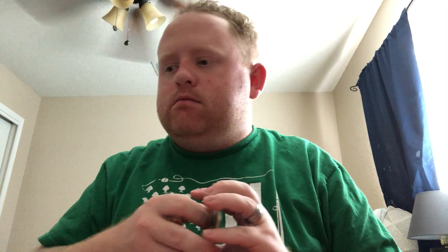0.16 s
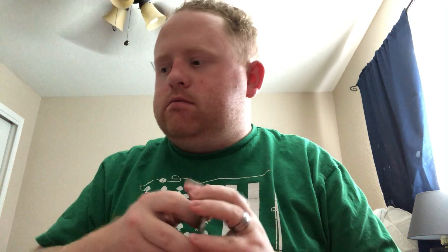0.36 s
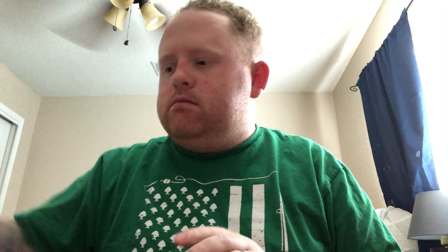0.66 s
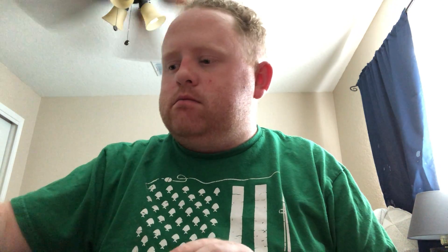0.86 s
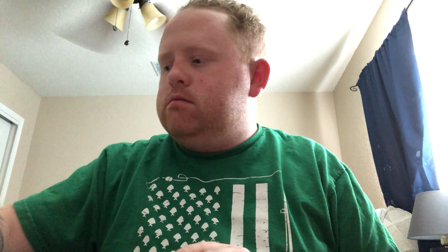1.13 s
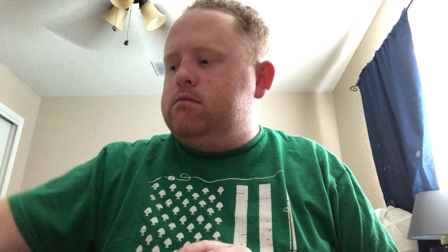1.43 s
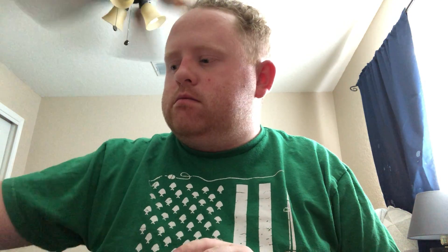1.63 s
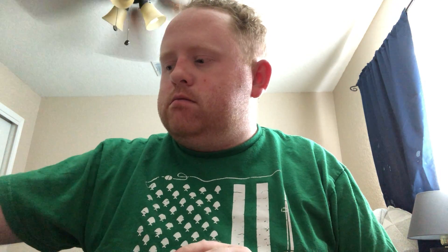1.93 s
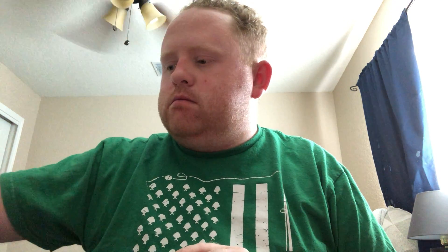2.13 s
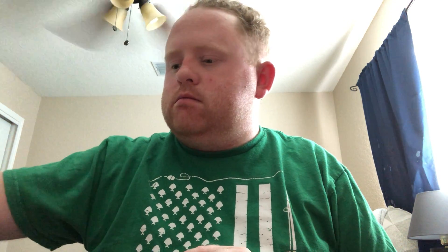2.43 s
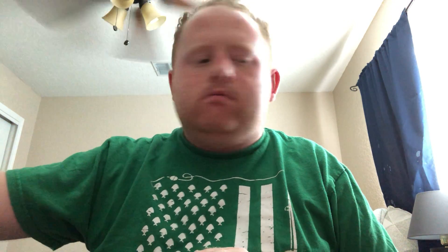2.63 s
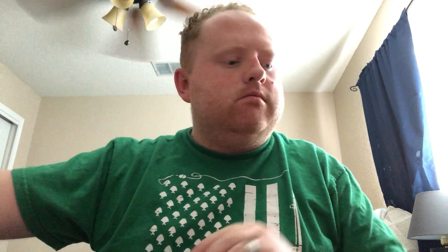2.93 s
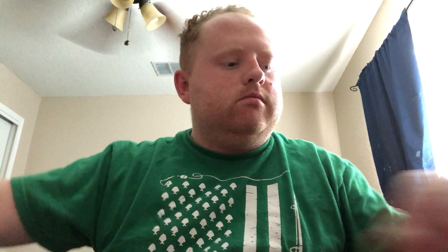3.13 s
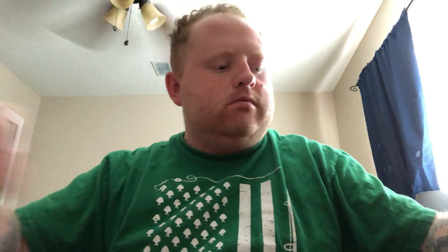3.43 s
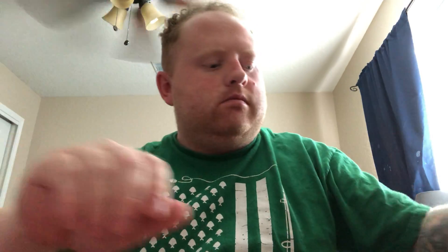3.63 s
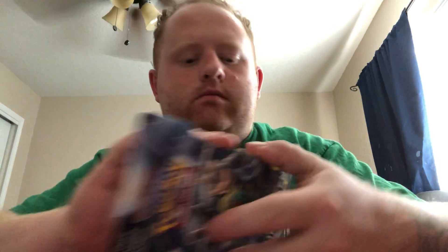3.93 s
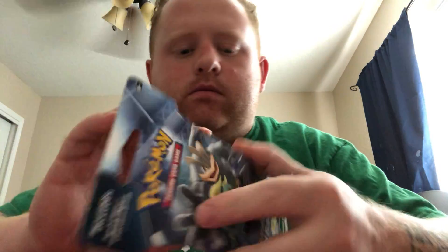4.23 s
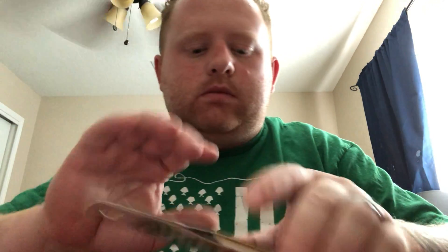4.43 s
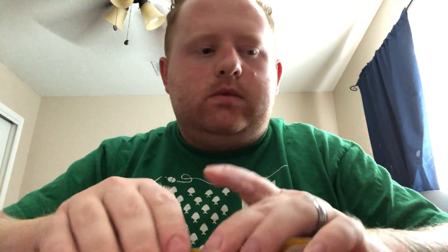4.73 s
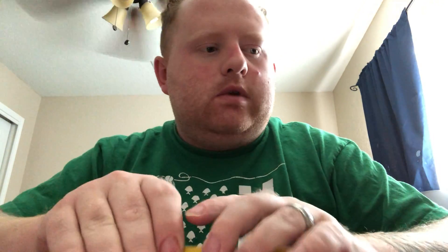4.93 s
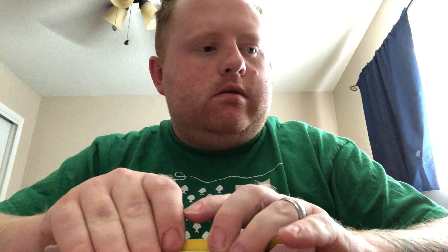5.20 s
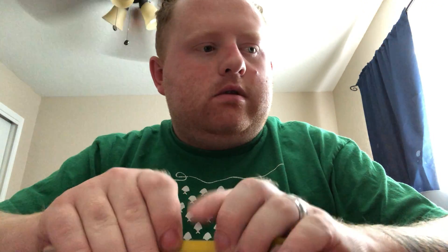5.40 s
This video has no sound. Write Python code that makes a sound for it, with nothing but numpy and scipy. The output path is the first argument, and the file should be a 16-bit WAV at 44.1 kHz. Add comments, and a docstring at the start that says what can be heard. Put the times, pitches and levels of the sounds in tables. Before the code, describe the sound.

Soft knocks lead to a sharp clack as cards are set down on a tabletop, then quietly pushed and tapped about. The handling moves nearer the microphone, where a card sleeve rustles and scuffs between the fingers, gives a run of crisp little cracks and briefly starts to rip. A quiet fan runs steadily in the small room throughout.

```python
"""Trading cards and a sleeve at a table.

A stack clacks down at arm's length and rings the table top, then is slid and tapped about among dull
knocks. Close by, fingers rub a card sleeve: friction, a stream of tiny catches. Fibres in its glued
flap crack as it bends, and it starts to rip open in quick slips. A fan runs in the small room."""
import sys
import numpy as np
from scipy import signal
from scipy.fft import rfft, irfft
from scipy.io import wavfile
from scipy.ndimage import uniform_filter1d

SR = 44100
rng = np.random.default_rng(int(sys.argv[2]) if len(sys.argv) > 2 else 0)


def wrap_up_sound(samples):
    """Save the sound to the file named by the first command line argument, as 16-bit audio."""
    columns = np.atleast_2d(samples).T
    # keep every value between -1 and 1, then stretch to whole-number steps
    tamed = np.clip(columns, -1, 1)
    steps = np.round(tamed * 32767).astype(np.int16)
    wavfile.write(sys.argv[1], SR, steps)


N = 245186
TIME_S = np.arange(N) / SR
EVENT_S = np.arange(8192) / SR  # time axis of one short event

# The stack lands on one edge, then falls flat.
# Each row: start in seconds, edge crack in dB, table ring in dB, chatter from 0 to 1.
CLACKS = [(1.2416, -21.5, -28, 0.08), (1.2436, -30, -38.5, 0.54)]
# Pushes of cards over the table. Each row: start in seconds, length in seconds, level in dB.
SLIDES = [(1.691, 0.16, -73.5), (1.847, 0.087, -51.5), (1.965, 0.03, -65), (1.995, 0.076, -88),
          (2.09, 0.071, -70.5), (2.18, 0.036, -57.5), (2.206, 0.16, -63), (2.481, 0.036, -71),
          (2.87, 0.063, -78.5), (3.468, 0.031, -59), (3.504, 0.042, -54.5), (3.568, 0.057, -77.5)]
# Stack corners touching down. Each row: start in seconds, level in dB, contact time in seconds.
TAPS = [(2.127, -50.5, .0009), (2.1955, -48, 0.00072), (2.209, -42, 0.00013), (2.2131, -44, 0.00027),
        (2.2194, -40.5, .0005), (2.232, -49, 0.0011)]
# Fibre cracks. Each row: start in seconds, level in dB, main resonance in Hz, bass in dB.
CRACKS = [(4.926, -47, 3140, 7), (4.938, -42, 4400, 3), (4.9848, -39, 3800, 0.5), (5.033, -43.5, 4530, -17),
          (5.0453, -45, 4540, -10), (5.0585, -42, 4440, -8), (5.0815, -41, 4530, -14),
          (5.1163, -34, 3810, 2), (5.1378, -35, 3940, -1), (5.1605, -39, 4300, -16),
          (5.174, -39.5, 4380, -2), (5.1952, -42.5, 4120, -2), (5.239, -39, 4440, -8.5),
          (5.2477, -39.5, 4700, -9), (5.2847, -32, 3700, -3.5), (5.319, -28, 3830, -3.5),
          (5.333, -43, 4600, -13), (5.353, -43, 4570, -8), (5.3691, -40.5, 3760, -4), (5.379, -44, 3660, 3),
          (5.392, -44.5, 3730, 2), (5.407, -47, 3530, 4), (5.4293, -48, 3800, 11), (5.4399, -40, 3660, 2)]
# The flap gives slowly, then runs like a zip. Each row: start and end in seconds, slips per second,
# then level, bass, treble and thump in dB.
RIPS = [(5.4532, 5.482, 92, -37, 0, -7.5, -37.5), (5.4995, 5.565, 124, -37, -6, 3, -36)]
# Finger strokes on the sleeve. Each row: start and length in seconds, then level, treble, whistle and
# singing in dB, singing pitch in Hz.
RUBS = [(3.657, 0.28, -67.5, -4.5, -12.5, -8, 2880), (3.951, 0.061, -64, -6, -17, -1, 2800),
        (4.022, 0.072, -61.5, -7, -1.5, 1.5, 2750), (4.099, 0.038, -66.5, -14, -14, 7.5, 2720),
        (4.135, 0.063, -66.5, -20, -21, -11, 2750), (4.182, 0.082, -67, -16, -17, 4.5, 2780),
        (4.306, 0.039, -72, -7, -3, -1, 2800), (4.414, 0.077, -68.5, -11, -14, -6, 2800),
        (4.531, 0.062, -65, -11, -8, -14, 2760), (4.649, 0.073, -59, -5.5, -13, -5, 3870),
        (4.738, 0.2, -67.5, -8, -33, -23, 3500), (4.833, 0.079, -54, -3, -15, -15, 3500),
        (4.895, 0.19, -56, -11.5, -25, -27, 3540), (5.06, 0.15, -66, -23, -30, -20, 3500),
        (5.283, 0.67, -62, -25, -39, -24, 3500), (5.438, 0.12, -55.5, -5, -24, -25, 3300)]
# Scuffs of card on card, skin and table.
# Each row: start in seconds, level in dB, length in seconds, bass in dB, treble in dB.
SCUFFS = [(0.027, -54, 0.0026, -5, 3), (0.447, -66, 0.021, 4.5, 7), (0.881, -62.5, 0.044, 5.5, 1),
          (1.0085, -53, 0.0024, 7, -12), (1.019, -55, 0.0039, -8, -2), (1.035, -64.5, 0.025, 1, 1),
          (1.997, -58, 0.016, 5, -8), (2.118, -56, 0.013, 8, -16), (2.192, -52, 0.0088, 2, -10),
          (2.207, -48, 0.012, -7, -5), (2.516, -63, 0.005, 11, -4), (2.551, -56.5, 0.016, 2, 1),
          (2.717, -64, 0.022, -0.5, 7.5), (3.013, -63, 0.005, 8, -10), (3.466, -55, 0.0034, 6, 2),
          (3.478, -54, 0.0074, 4, -17), (3.508, -52, 0.013, -3, -8), (3.517, -44.5, 0.005, -5, 5),
          (3.523, -41.5, 0.004, 0.5, 3.5), (3.543, -53, 0.014, 5, -16), (3.644, -63, 0.0038, 1, 14),
          (3.958, -50, 0.0046, 1, 7), (3.967, -45, 0.0048, -9, -6), (3.9745, -43.5, 0.0019, -5, -11),
          (3.988, -54, 0.00086, -5, 13), (4.25, -54.5, 0.0023, 2, 16), (4.356, -51.5, 0.0026, -11, -1),
          (4.3646, -53, 0.005, -10, 1), (4.4105, -37.5, 0.0038, -3, 2), (4.635, -46.5, 0.0024, 6, 12),
          (4.73, -42, 0.0028, -1, 1.5), (4.828, -56, 0.011, -16, 5), (4.958, -48, 0.0045, 2, 4),
          (5.296, -53, 0.0032, -9, 11)]
# Soft knocks from the table and the handled sleeve. Each row: start in seconds, level in dB, pitch in Hz.
KNOCKS = [(0.277, -44.5, 113), (0.351, -48.5, 130), (0.371, -49, 96), (0.899, -48, 103), (1.021, -50, 89),
          (1.262, -43, 97), (1.274, -42, 215), (1.949, -48, 335), (2.003, -45.5, 680), (2.015, -54, 161),
          (2.05, -47, 115), (2.143, -48, 349), (2.232, -48, 162), (2.275, -45, 370), (2.244, -46, 80),
          (2.564, -47, 155), (3.04, -45.5, 300), (4.214, -49, 76.6), (4.412, -44, 890), (4.732, -40, 495),
          (5.013, -43.5, 460), (5.324, -51, 82), (5.371, -45.5, 120), (5.402, -45, 93), (5.4886, -37, 320)]

# Resonances. Each row: frequency in Hz, width in Hz, level in dB.
TABLE_MODES = [(355, 92, 0), (453, 36, 10), (690, 70, 1), (785, 80, 0.5), (1092, 83, -4.5), (1550, 90, -4),
               (1742, 84, -5), (2140, 78, -3), (3570, 230, -18)]
PRESSED_STACK_MODES = [(390, 84, 11.5), (697, 65, 3.5), (1275, 180, 3.5), (1625, 170, 3.5),
                       (2290, 170, -7.5), (2864, 64, 1.5), (3450, 120, -14), (4700, 460, -14)]
LOOSE_STACK_MODES = [(376, 31, 13.5), (730, 42, 9), (955, 100, -8), (1230, 93, 0.5), (1620, 170, -12),
                     (2120, 70, 0.5), (2390, 70, 0), (3100, 170, -5), (3520, 250, 0), (3900, 120, 5),
                     (5240, 340, -19)]
LYING_SLEEVE_MODES = [(830, 140, 0), (1210, 160, 0), (1720, 110, 6), (2200, 86, 5.5), (2800, 110, 0),
                      (3640, 130, -11), (4530, 120, -9), (5000, 80, -3)]
HELD_SLEEVE_MODES = [(617, 77, 6), (1094, 106, 10), (1920, 260, 4), (2670, 1240, 9.5), (3630, 480, 9),
                     (5670, 460, 2), (6630, 220, -1), (10500, 1200, -13.5)]
PANEL_MODES = [(236, 37, 1), (320, 270, 5.5), (398, 87, 4), (535, 160, -25)]  # the sleeve's panel
FLAP_MODES = [(3900, 600, -5), (6000, 650, 4), (10400, 900, -11)]
SNAP_MODES = [(1040, 370, 2.5), (1680, 780, -4), (3170, 900, -8), (11600, 2100, -16.5)]  # a finger snaps off the sleeve
COATING_MODES = [(1170, 170, 4), (2820, 230, 10), (3360, 180, 5)]  # the coating sings under a finger
WHISTLE_MODES = [(10400, 1700, 0), (13300, 2500, -5)]  # dry fingertip on gloss

# Spectra. Each row: frequency in Hz, gain in dB.
EDGE_EQ = [(150, -44), (500, -6), (1100, -8), (1580, 2.5), (1900, 3.5), (2300, 5), (3000, -4.5), (3700, 0),
           (5000, -9), (6500, -14), (7400, -9.5), (10000, -21.5), (16000, -31)]
BRUSH_EQ = [(250, -3), (450, 8), (900, 3), (2500, -4), (5500, -3), (7500, -7), (10000, -15), (16000, -13)]
SLIDE_EQ = [(150, -16), (400, 13), (600, -1), (900, -14), (1500, -1), (2300, -6), (3200, -8.5),
            (4300, -14.5), (6470, -21.5), (16000, -38)]
RIP_EQ = [(530, -34), (900, 10), (1510, -3), (1830, -1), (2420, 7), (2760, -12), (3040, 7.5), (4250, 5),
          (4860, -9), (6030, 5), (7860, -1.5), (10400, -5), (12400, -23), (16000, -31)]
RUB_EQ = [(700, -5.5), (1050, 2.5), (1500, -1), (2100, 1.5), (3000, -3), (4400, -2.5), (6000, -3.5),
          (8000, -7), (11000, -17), (16000, -17)]
SCUFF_EQ = [(150, -25), (450, 5), (800, 10.5), (1300, 8.5), (2200, 7), (3800, 3), (5500, 0), (8000, -5),
            (16000, -25)]
AIR_EQ = [(15, -51), (25, -27), (48, -7.5), (92, -9), (114, -2), (185, -11), (223, -2.5), (263, -8.5),
          (293, -3), (754, -12.5), (818, -15), (1040, -15), (1650, -27), (3000, -35.5), (5200, -38),
          (7510, -45), (10500, -50.5), (16000, -53.5)]
TABLE_EQ = [(100, -31), (200, -15), (320, 8)]  # little radiates below the first mode
TAP_EQ = [(120, -15), (340, 0.5), (2000, 4)]
ROOM_EQ = [(100, 4), (450, -0.5), (1000, 6), (1800, -2), (4000, -4.5), (10000, 0)]

# Fan motor hum. Each row: frequency in Hz, level in dB.
HUM = [(59.8, -68), (119.7, -64), (220, -65.5), (295, -68.5), (360, -99), (1066.5, -74)]
# Room reverberation. Each row: frequency in Hz, time to fall 60 dB in seconds.
ROOM_T60 = [(100, 0.21), (500, 0.32), (2000, 0.37), (4000, 0.34), (10000, 0.24)]

REACH_S, HELD_S = 3.3, 3.96  # the hand leaves the stack; the sleeve is held
SLIP_ATTACK_S, SLIP_DECAY_S = 0.0005, 0.00059
# Each pair: light push, firm push.
PUSH_DB, PUSH_BASS_DB, PUSH_TREBLE_DB, PUSH_RING_DB = (-75, -49.5), (8.5, 2), (2.5, -17.5), (-15, 7.5)


def clack():
    """The stack brushes down, its edge cracks on the table, the cards chatter and the top rings."""
    out = np.zeros(N)
    for start_s, crack_db, ring_db, chatter in CLACKS:
        contact = chatter * rng.standard_normal(len(EVENT_S)) * np.exp(-EVENT_S / 0.0014)
        contact[0] -= 1
        edge = disperse(colour(contact, EDGE_EQ), 0.00012)
        add(out, start_s, undb(crack_db) * unit(edge, 0.0019))
        top = colour(ring(TABLE_MODES, scatter=0.0074), TABLE_EQ)
        add(out, start_s + 0.00104, undb(ring_db) * unit(top, 0.0064))
    from_peak_s = TIME_S - (CLACKS[0][0] - 0.005)
    swell = np.exp(np.minimum(from_peak_s / 0.0063, -from_peak_s / 0.0021))
    brush = colour(grit(N, rate_hz=46000, spread_db=2), BRUSH_EQ)
    return out + undb(-38) * swell * unit(brush)


def slides(attack_s=0.037, release_s=0.02):
    """Card drags on the table: a light push hisses, a firm one rings the stack, later the sleeve."""
    out = np.zeros(N)
    catches = grit(N, rate_hz=5000, spread_db=-1) * undb(0.98 * wander(90))
    stack = resonate(catches, PRESSED_STACK_MODES, scatter=0.0035)
    sleeve = resonate(catches, LYING_SLEEVE_MODES, scatter=0.0035)
    friction = unit(colour(catches, SLIDE_EQ))
    high = band(friction, 5150, 19845)
    for start_s, length_s, db in SLIDES:
        bass_db = np.interp(db, PUSH_DB, PUSH_BASS_DB)
        treble_db = np.interp(db, PUSH_DB, PUSH_TREBLE_DB)
        ring_db = np.interp(db, PUSH_DB, PUSH_RING_DB)
        drag = friction + undb(ring_db) * (stack if start_s < REACH_S else sleeve)
        low, middle = band(drag, 353, 1290), band(drag, 1180, 3900)
        age_s = TIME_S - start_s
        push = np.clip(age_s / attack_s, 0, 1) * np.exp(-np.maximum(age_s - length_s, 0) / release_s)
        out += undb(db) * push * (middle + undb(bass_db) * low + undb(treble_db) * high)
    return out


def taps():
    """A corner meets the table and rings the stack; a softer contact is longer and duller."""
    out = np.zeros(N)
    for start_s, db, contact_s in TAPS:
        force = np.exp(-EVENT_S / contact_s)
        tap = colour(resonate(force, LOOSE_STACK_MODES, scatter=0.011), TAP_EQ)
        add(out, start_s, undb(db) * unit(tap, 0.0079))
    return out


def cracks():
    """Each breaking fibre flicks the sleeve, which rings briefly and echoes off the table."""
    out = np.zeros(N)
    for start_s, db, hz, bass_db in CRACKS:
        treble_db = -2 + 0.38 * (db + 38)  # harder is brighter
        flick = ring(HELD_SLEEVE_MODES, scale=hz / HELD_SLEEVE_MODES[4][0], scatter=0.057)
        flick = shelves(flick * rise(0.00008), bass_db, treble_db)
        flick = undb(db) * unit(disperse(flick, 0.000336), 0.0022)
        add(out, start_s - 0.0002, flick)
        add(out, start_s + 0.003, undb(-17.5) * shelves(flick, 2.7, -1.8))
    return out


def rips(max_slips=10):
    """The flap tears in quick slips: each a spray of fibres, then the freed panel swings back."""
    out = np.zeros(N)
    envelope = rise(SLIP_ATTACK_S) ** 2 * np.exp(-EVENT_S / SLIP_DECAY_S)
    for slip_s, end_s, rate_hz, db, bass_db, treble_db, thump_db in RIPS:
        for late, weak, heavy, lag in rng.standard_normal((max_slips, 4)):
            fibres = grit(len(EVENT_S), rate_hz=30000, spread_db=4) * envelope
            rasp = resonate(fibres, FLAP_MODES, scatter=0.03)
            spray = unit(colour(fibres, RIP_EQ)) + undb(-9) * rasp
            spray = unit(shelves(spray, bass_db, treble_db, bass_hz=1850), 0.00094)
            swing = unit(ring(PANEL_MODES, scatter=0.1) * rise(0.0032), 0.006)
            if slip_s < end_s:
                add(out, slip_s, undb(db - 2 * np.tanh(weak)) * spray)
                swing_s = slip_s + 0.002 + 0.003 * abs(lag)
                add(out, swing_s, undb(thump_db + 2.5 * np.tanh(heavy)) * swing)
            slip_s += (1 + 0.02 * late) / rate_hz
    return out


def rubs():
    """Fingers drag on the coating; each stroke has its own hiss, whistle and singing pitch."""
    catches = grit(N, rate_hz=3500, spread_db=-2.5) * undb(1.17 * wander(110))
    drag = unit(colour(catches, RUB_EQ))
    hiss = band(drag, 6000, 19000)
    body = undb(-3.5) * band(drag, 250, 2060) + band(drag, 1760, 4200)
    whistle = band(resonate(catches, WHISTLE_MODES), 8000, 19000)
    strokes = np.zeros(N)
    for start_s, length_s, db, treble_db, whistle_db, singing_db, hz in RUBS:
        singing = resonate(catches, COATING_MODES, scale=hz / COATING_MODES[1][0])
        stroke = body + undb(treble_db) * hiss + undb(whistle_db) * whistle + undb(singing_db) * singing
        progress = np.clip((TIME_S - start_s) / length_s, 0, 1)
        arch = np.abs(np.sin(np.pi * progress)) ** 0.92  # the finger speeds up, then slows
        strokes += undb(db) * arch * stroke
    # once held, the sleeve creeps in the fingers and its panel rumbles
    creep = undb(-70) * (body + undb(-4.5) * hiss)
    rumble = undb(-61.5) * band(resonate(catches, PANEL_MODES), 160, 580)
    held = np.interp(TIME_S, [HELD_S, HELD_S + 0.031], [0, 1])
    return strokes + held * (creep + rumble)


def scuffs(lift_s=(3.6, 3.9)):
    """Brief bursts of catches ring what lies on the table or, once lifted, the sleeve in the hands."""
    out = np.zeros(N)
    for start_s, db, length_s, bass_db, treble_db in SCUFFS:
        age = EVENT_S / max(length_s, 0.001)
        burst = grit(len(EVENT_S), rate_hz=14000, spread_db=-6) * np.sqrt(age) * np.exp(-age * 2.03)
        hollow = resonate(burst, PRESSED_STACK_MODES if start_s < REACH_S else LYING_SLEEVE_MODES)
        snap = resonate(burst, SNAP_MODES)
        hollow_db = np.interp(start_s, lift_s, [-3, -29])
        snap_db = np.interp(start_s, lift_s, [-15, 1])
        scuff = unit(colour(burst, SCUFF_EQ)) + undb(hollow_db) * hollow + undb(snap_db) * snap
        add(out, start_s, undb(db) * unit(shelves(scuff, bass_db, treble_db), length_s))
    return out


def knocks():
    """Soft knocks from the table and the handled sleeve: a few heavily damped cycles."""
    out = np.zeros(N)
    for start_s, db, hz in KNOCKS:
        thud = ring([(hz, hz * 0.79, 0), (hz * 1.74, hz * 0.62, -12)]) * rise(0.5 / hz)
        add(out, start_s, undb(db) * unit(thud, 1.95 / hz))
    return out


def fan():
    """Steady moving air and a slightly wavering motor hum."""
    air = unit(colour(rng.standard_normal(N), AIR_EQ))
    out = undb(-53.5 + 0.5 * wander(5.53)) * air
    for hz, db in HUM:
        phase = 2 * np.pi * np.cumsum(hz + 1.57 * wander(12)) / SR
        out += undb(db + 2 * wander(6.44)) * np.sqrt(2) * np.sin(phase)
    return out


def room(x):
    """Diffuse reflections from near walls; the mids ring longest."""
    noise, tail = rng.standard_normal(SR // 2), 0
    age_s = np.arange(len(noise)) / SR
    edges_hz = np.geomspace(50, 18000, 9)
    for lo_hz, hi_hz in zip(edges_hz, edges_hz[1:]):
        decay = undb(-60 * age_s / on_log(np.sqrt(lo_hz * hi_hz), ROOM_T60))
        tail += band(noise, lo_hz, hi_hz) * np.sqrt(hi_hz - lo_hz) * decay
    onset = np.interp(age_s, [0.002, 0.004], [0, 1])
    tail = unit(tail * onset, 1 / SR)
    return colour(signal.fftconvolve(x, tail)[:N], ROOM_EQ)


def grit(size, rate_hz, spread_db):
    """Friction: a dense stream of tiny catches of uneven strength."""
    caught = rng.random(size) < rate_hz / SR
    strength = undb(spread_db * np.minimum(rng.exponential(size=size), 4))
    return unit(caught * strength * rng.standard_normal(size))


def ring(modes, scale=1, scatter=0.0085):
    """Damped modes after one blow, each randomly detuned a little."""
    hz, width_hz, db = np.transpose(modes)[:, :, None]
    hz = hz * scale * (1 + scatter * rng.standard_normal(hz.shape))
    envelopes = undb(db) * width_hz * np.exp(-np.pi * width_hz * EVENT_S)
    return np.sum(envelopes * np.sin(2 * np.pi * hz * EVENT_S), axis=0)


def resonate(force, modes, **tuning):
    """Modes driven by a force, at rms 1."""
    return unit(signal.fftconvolve(force, ring(modes, **tuning))[:len(force)])


def disperse(x, delay_s):
    """Higher bending waves travel faster; delay_s holds at 3 kHz."""
    hz = np.arange(len(x) // 2 + 1) * SR / len(x)
    return irfft(rfft(x) * np.exp(-4j * np.pi * delay_s * np.sqrt(3000 * hz)), len(x))


def colour(x, points):
    """Causal filter through (Hz, dB) points, built from the cepstrum."""
    size = len(EVENT_S)
    hz = np.arange(size // 2 + 1) * SR / size
    cepstrum = irfft(np.log(undb(on_log(hz, points))))
    cepstrum[1:size // 2] *= 2
    cepstrum[size // 2 + 1:] = 0
    return signal.fftconvolve(x, irfft(np.exp(rfft(cepstrum))))[:len(x)]


def shelves(x, bass_db, treble_db, bass_hz=1500):
    """Bass and treble gain around a flat middle."""
    return colour(x, [(bass_hz, bass_db), (bass_hz * 2, 0), (3180, 0), (7620, treble_db)])


def band(x, lo_hz, hi_hz):
    """Band-pass, at rms 1."""
    return unit(signal.sosfilt(signal.butter(3, [lo_hz, hi_hz], "band", fs=SR, output="sos"), x))


def wander(rate_hz):
    """Smooth random drift, spread near 1."""
    hold = int(SR / rate_hz)
    steps = np.repeat(rng.standard_normal(N // hold + 1), hold)
    return 1.29 * uniform_filter1d(uniform_filter1d(steps, hold), hold)[:N]


def rise(tau_s):
    """Exponential attack from 0 to 1."""
    return 1 - np.exp(-EVENT_S / tau_s)


def on_log(hz, points):
    """Interpolate (Hz, value) points over log frequency."""
    points_hz, values = np.transpose(points)
    return np.interp(np.log(np.maximum(hz, 1)), np.log(points_hz), values)


def undb(db):
    """Decibels to gain."""
    return 10 ** (np.asarray(db) / 20)


def unit(x, span_s=None):
    """Scale to rms 1, as if all energy lay within span_s."""
    return x / np.sqrt(np.sum(x ** 2) / (span_s * SR if span_s else len(x)) + 1e-20)


def add(out, start_s, x):
    """Mix x in at start_s."""
    i = int(start_s * SR)
    out[i:i + len(x)] += x[:max(N - i, 0)]


def scene():
    """Mono mix; things at arm's length carry more room than the sleeve in the hands."""
    landing = clack()
    handling = slides() + taps() + scuffs() + knocks() + rubs() + cracks() + rips()
    send_db = np.interp(TIME_S, [3.6, 3.95], [-7, -15])  # the hands come close
    reverb = room(undb(-10) * landing + undb(send_db) * handling)
    return (landing + handling + reverb + fan())[None]


def record(dry):
    """High-pass at 35 Hz, steep low-pass at 16.2 kHz."""
    dry = signal.sosfilt(signal.butter(2, 35, "high", fs=SR, output="sos"), dry)
    return signal.sosfilt(signal.ellip(8, 0.2, 70, 16200, fs=SR, output="sos"), dry)


dry = scene()
out = record(dry)
wrap_up_sound(out)
```